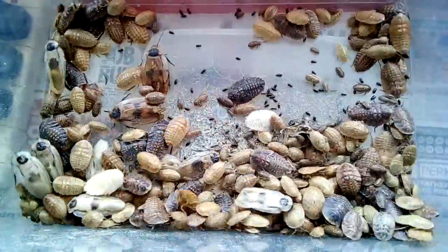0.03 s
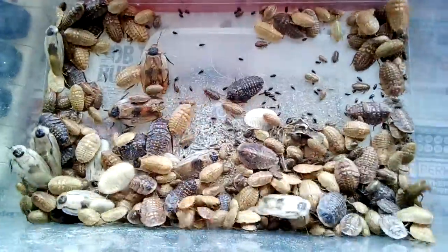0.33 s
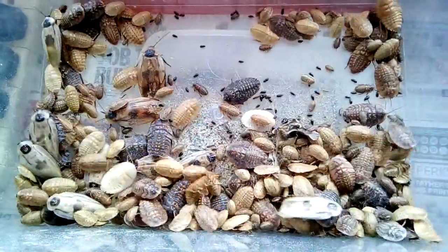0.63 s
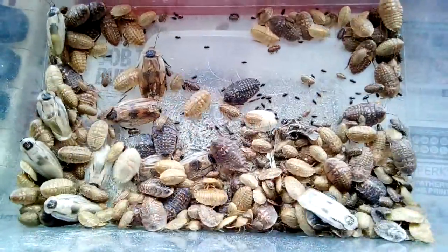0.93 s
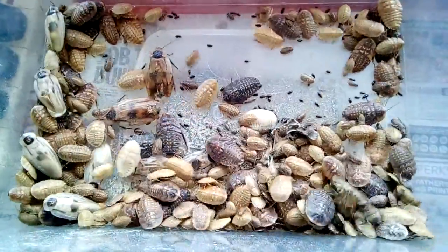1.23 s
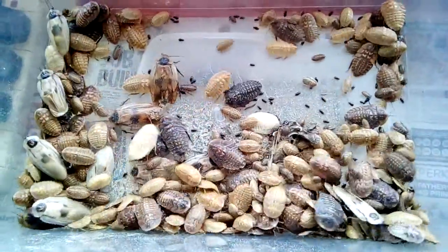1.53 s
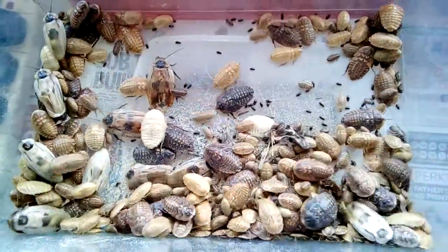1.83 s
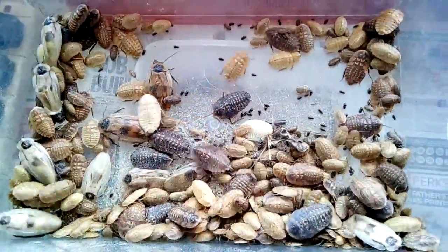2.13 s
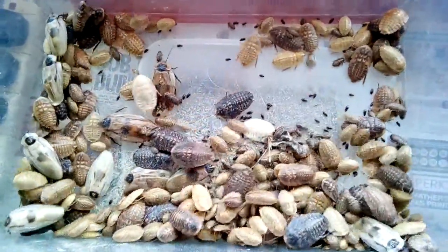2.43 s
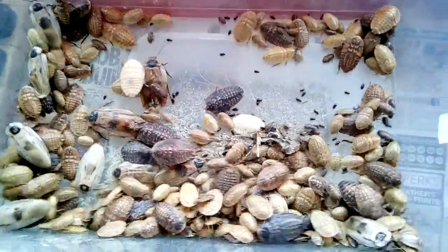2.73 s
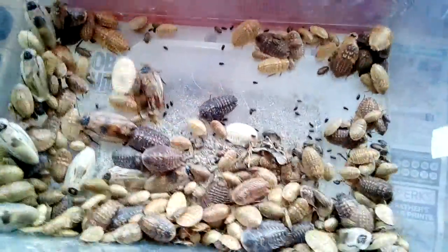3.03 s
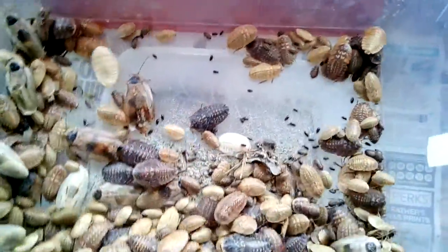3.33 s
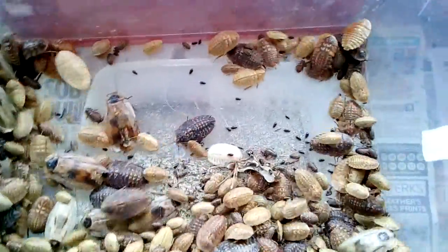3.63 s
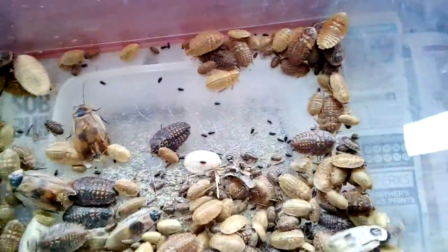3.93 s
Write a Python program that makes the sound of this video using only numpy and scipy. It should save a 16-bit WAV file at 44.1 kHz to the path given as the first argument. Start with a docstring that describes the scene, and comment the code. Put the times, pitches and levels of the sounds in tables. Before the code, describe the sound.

A close, rustling hiss of many cockroaches scuttling in a plastic container, with a few taps.

```python
"""A close, crackly hiss of cockroaches crawling over each other in a plastic tub, indoors.
Countless leg ticks and shell scrapes merge into the hiss, and the feet make the tub ring and drone.
A few sharp taps and dull bumps on the plastic stand out.
In the last second the heap scrambles harder."""
import sys
import numpy as np
from scipy import signal
from scipy.fft import rfft, irfft
from scipy.io import wavfile
from scipy.ndimage import uniform_filter1d

SR = 44100
rng = np.random.default_rng(int(sys.argv[2]) if len(sys.argv) > 2 else 0)


def dump_mix(stems):
    """Bounce the given channels to the path in sys.argv[1] as a 16-bit WAV at rate SR."""
    frames = np.atleast_2d(stems).T  # one column per channel
    limited = np.clip(frames, -1, 1)  # hard clip at full scale
    pcm = np.round(limited * 32767).astype(np.int16)
    wavfile.write(sys.argv[1], SR, pcm)


N = 176400  # 4 seconds


def gain(db):
    """Turn decibels into a number to multiply by."""
    return 10 ** (np.asarray(db) / 20)


def normalize(x):
    """Scale a sound to an average strength (rms) of 1."""
    return x / np.sqrt(np.mean(x ** 2))


def fade(rows, column=1):
    """A gain that glides from one (time, level) row to the next."""
    rows = np.array(rows)
    return gain(np.interp(np.arange(N) / SR, rows[:, 0], rows[:, column]))


def shape_tone(x, points):
    """Make some frequencies stronger than others, then scale to strength 1."""
    hz, db = np.array(points).T
    freqs = np.maximum(np.fft.rfftfreq(N, 1 / SR), 1)
    gains = gain(np.interp(np.log(freqs), np.log(hz), db))
    return normalize(irfft(rfft(x) * gains, N))


def resonate(x, hz, width, passes=1):
    """Keep the sound around one pitch; a narrower width rings longer."""
    b, a = signal.iirpeak(hz, hz / width, fs=SR)
    for _ in range(passes):
        x = signal.lfilter(b, a, x)
    return x


def cut_highs(x, edge_hz=7000):
    """Steeply remove the treble above the edge."""
    return signal.sosfilt(signal.butter(12, edge_hz, fs=SR, output="sos"), x)


def wander(per_s):
    """Drift up and down, gliding to a new random value per_s times a second."""
    hold = int(SR / per_s)
    steps = np.repeat(rng.standard_normal(N // hold + 2), hold)
    return normalize(uniform_filter1d(steps, hold)[hold // 2:hold // 2 + N])


def ticks(per_s, spread_db):
    """Tiny hits at random times: most are faint, a few are strong."""
    size = gain(spread_db * np.minimum(rng.exponential(size=N), 7))
    hits = rng.random(N) < per_s / SR
    return normalize(hits * size * rng.standard_normal(N))


def strike(at, hz, width):
    """One blow sets off a ring that dies quickly; its peak is 1."""
    blow = 1e-18 + (np.arange(N) == int(at * SR))  # the tiny offset keeps the filter fast
    ring = resonate(blow, hz, width, passes=3)
    return ring / np.max(np.abs(ring))


# tone of the rustling legs (frequency [Hz], relative level [dB])
RUSTLE_TONE = [(530, -49), (900, -24), (1070, -9), (1240, -11), (1480, -1), (1630, -6), (2000, -2),
               (2600, -11), (3170, -13.5), (4400, -11), (5300, -10), (5900, -6), (6600, -10), (7500, -16.5)]
# how busy the heap is (time [s], rustle level [dB], claw fizz level [dB])
HEAP_LEVELS = [(0, -56, -60), (.65, -54.5, -60), (1.0, -55, -60.5), (1.22, -56.5, -62), (1.58, -54, -60),
               (2.0, -55.5, -62), (2.4, -54.5, -62.5), (2.76, -54.5, -61), (3.0, -51.5, -63),
               (3.45, -60.5, -63), (4, -50, -62)]

def leg_rustle(flurry):
    """Legs tick on shells so often that the ticks blur into a hiss."""
    legs = ticks(per_s=14000, spread_db=1.45) * gain(1.2 * flurry)
    return cut_highs(shape_tone(legs, RUSTLE_TONE), edge_hz=7550) * fade(HEAP_LEVELS)


# tone of the finest claw scratching (frequency [Hz], relative level [dB])
CLAW_TONE = [(5000, -54), (7000, -1), (8200, -19), (9700, -8.5), (11000, -10), (12000, -1.5), (12800, 6.5),
             (15500, 5)]

def claw_fizz(flurry):
    """Scratching claws make a very high fizz that partly follows the flurries of the legs."""
    flicker_db = 2 * (0.68 * flurry + 0.59 * wander(per_s=60))
    scratching = ticks(per_s=25000, spread_db=1.4) * gain(flicker_db)
    single_ticks = gain(-8.5) * ticks(per_s=200, spread_db=0.8)
    return shape_tone(scratching + single_ticks, CLAW_TONE) * fade(HEAP_LEVELS, column=2)


# pitches at which the tub rings (frequency [Hz], width [Hz], relative level [dB])
TUB_PITCHES = [(247, 19.2, 5.5), (499.6, 20.7, 3.5), (752, 35, -2.5), (1065, 29, -1.5), (1418, 80, -3.5),
               (1970, 240, -11.5), (2585, 128, -5)]
# how hard the feet make the tub ring (time [s], level [dB])
RING_LEVELS = [(0, -62), (.3, -61), (.55, -57.5), (.68, -63), (.96, -57), (1.15, -63.5), (1.7, -64),
               (2.0, -61), (2.2, -59), (2.4, -61), (2.75, -64.5), (3.12, -55), (3.3, -57.5), (3.47, -60.5),
               (3.65, -59.5), (4, -57.5)]

def tub_ring():
    """Pattering feet keep the plastic ringing at its own pitches."""
    feet = ticks(per_s=2500, spread_db=1.2) * gain(1.9 * wander(per_s=20))
    ring = sum(gain(db) * resonate(feet, hz, width) for hz, width, db in TUB_PITCHES)
    return normalize(ring) * fade(RING_LEVELS)


# tone of the flexing tub (frequency [Hz], relative level [dB])
DRONE_TONE = [(25, -14), (50, -8.5), (95, -6.5), (135, -2), (165, 5), (195, -5.5), (300, -0.5), (420, -8),
              (900, -5), (1400, -28)]
# loudness of the drone (time [s], level [dB])
DRONE_LEVELS = [(0, -68), (1.0, -65), (1.3, -65), (2.0, -65), (2.1, -59), (2.35, -67.5), (2.52, -63),
                (2.75, -66.5), (3.15, -60.5), (3.7, -69.5), (3.93, -65), (4, -88)]

def tub_drone():
    """The tub flexes under the heap and gives a low drone."""
    return shape_tone(ticks(per_s=1500, spread_db=1.1), DRONE_TONE) * fade(DRONE_LEVELS)


# weight shifting on the tub's floor (time [s], peak level [dB])
WEIGHT_SHIFTS = [(0.053, -52), (.195, -56), (0.876, -56), (0.943, -52), (2.087, -47), (2.18, -52.5),
                 (2.298, -55), (3.085, -56), (3.155, -54), (3.901, -53.5)]

def floor_hums():
    """Shifting bodies make the floor of the tub hum briefly at its lowest ringing pitch."""
    return sum(gain(db) * strike(at, hz=241.6, width=49) for at, db in WEIGHT_SHIFTS)


# claw flicks and, near 2.06 s, the two contact ticks of the double bump (time [s], level [dB])
HIGH_RASPS = [(.333, -52), (.535, -55), (.89, -59), (1.42, -57), (2.053, -60), (2.066, -59), (2.12, -57),
              (2.648, -53), (2.929, -56), (2.98, -59), (3.085, -55), (3.145, -58), (3.39, -57), (3.59, -58)]

def high_rasps(fade_s=0.0092):
    """Short, very high rasps, as a claw flicks across a shell or a bump makes contact."""
    t = np.arange(N) / SR
    swells = sum(gain(db) * np.exp(-2 * ((t - at) / fade_s) ** 2) for at, db in HIGH_RASPS)
    return shape_tone(ticks(per_s=9000, spread_db=2.2), CLAW_TONE) * swells


# scrapes on shells and plastic, plus the tub's brief low ring after the thump, at 2.52 s
# (peak time [s], length [s], level [dB], frequency [Hz], width [Hz])
SCRAPES_AND_RING = [(0.34, .012, -61, 3500, 5000), (0.562, 0.024, -48, 1580, 810),
                    (0.588, 0.03, -53, 5750, 700), (0.67, 0.032, -55.5, 4470, 4000),
                    (0.986, 0.05, -57.5, 540, 450), (1.016, 0.014, -56, 2080, 800),
                    (1.098, 0.014, -57.5, 4530, 2500), (1.32, 0.032, -59, 2330, 1200),
                    (1.416, 0.023, -54.5, 3020, 5040), (1.582, 0.034, -55.5, 1800, 900),
                    (2.288, 0.013, -53.5, 4600, 2400), (2.487, 0.018, -53, 4300, 2200),
                    (2.52, 0.043, -56, 152, 90), (2.845, 0.022, -55, 5700, 2500),
                    (2.93, 0.0076, -50.5, 4000, 5000), (3.041, 0.0054, -47, 5550, 2500),
                    (3.078, 0.028, -47, 1980, 3000), (3.146, 0.011, -43, 4530, 2400),
                    (3.154, 0.045, -58.5, 533, 400), (3.266, 0.0078, -45, 6000, 1800),
                    (3.275, 0.074, -58.5, 140, 60), (3.384, 0.021, -47.5, 6300, 2500),
                    (3.424, 0.0097, -47.5, 4700, 2500), (3.457, 0.071, -54.5, 1480, 350),
                    (3.51, 0.053, -58, 149, 50), (3.589, 0.0075, -46.5, 4800, 3500),
                    (3.661, 0.02, -51, 4960, 2600), (3.881, 0.03, -49.5, 2190, 600),
                    (3.911, 0.06, -49, 152, 55.9), (3.939, 0.033, -42, 2726, 2800),
                    (3.983, 0.0077, -45, 3900, 2500)]

def scrapes_and_ring():
    """Scrapes and one low ring of the tub: ticks around one pitch swell quickly and die away."""
    t, out = np.arange(N) / SR, 0
    for at, length, db, hz, width in SCRAPES_AND_RING:
        fade_s = length * np.where(t < at, 0.6, 1.31)  # quick rise, slower fall
        swell = np.exp(-2 * ((t - at) / fade_s) ** 2)
        band = resonate(ticks(per_s=5000, spread_db=0.5), hz, width, passes=2)
        out = out + gain(db) * swell * normalize(band)
    return cut_highs(out, edge_hz=7160)


# tone of a tap's crack (frequency [Hz], relative level [dB])
CRACK_TONE = [(300, -3), (1200, 0.5), (2500, -2.5), (5400, -9), (6500, -1), (8200, -20), (9600, -11.5),
              (11000, -15), (13500, -8), (15000, -1), (17000, 0.5)]
# sharp taps on the wall; row two is the first tap's quick echo, 3 ms later
# (time [s], wall pitch [Hz], wall width [Hz], wall level [dB],
# shell pitch [Hz], shell width [Hz], shell level [dB], crack level [dB])
WALL_TAPS = [(1.0804, 3900, 3600, -32, 6000, 1700, -31, -51),
             (1.0832, 3840, 2000, -42, 6140, 1000, -37, -60), (2.4520, 3390, 900, -32, 4070, 790, -26, -29),
             (3.0543, 700, 1700, -28, 1980, 1460, -28, -43), (3.242, 1700, 700, -28, 5740, 1800, -24, -25),
             (3.6377, 3050, 3500, -30.5, 4840, 2500, -30.5, -49)]

def wall_taps(crack_s=0.00055):
    """Each tap, and the first one's echo, is a crack with a very short ring of wall and shell."""
    t, out = np.arange(N) / SR, 0
    for at, wall_hz, wall_width, wall_db, shell_hz, shell_width, shell_db, crack_db in WALL_TAPS:
        wall = gain(wall_db) * strike(at, wall_hz, wall_width)
        shell = gain(shell_db) * strike(at, shell_hz, shell_width)
        burst = np.exp(-((t - at) / crack_s - 1) ** 2)
        crack = gain(crack_db) * burst * shape_tone(rng.standard_normal(N), CRACK_TONE)
        out = out + cut_highs(wall + shell, edge_hz=8000) + crack
    return out


# a double bump, then a thump (time [s], pitch [Hz], width [Hz], peak level [dB], overtone level [dB])
DULL_BUMPS = [(2.0500, 359, 186, -34.5, -38.5), (2.0615, 365, 222, -34.5, -37.5),
              (2.4513, 86, 148, -35.5, -66)]

def dull_bumps(overtone_ratio=1.7):
    """A soft knock flexes the tub: a low note plus a higher one, its overtone."""
    out = 0
    for at, hz, width, db, overtone_db in DULL_BUMPS:
        low_note = gain(db) * strike(at, hz, width)
        overtone = gain(overtone_db) * strike(at, hz * overtone_ratio, width)
        out = out + low_note + overtone
    return out


# tone of the scrambling shells (frequency [Hz], relative level [dB])
SCRAMBLE_TONE = [(150, -15), (300, -16), (550, -6), (800, -9), (1150, -10), (1450, 0.5), (2050, 1),
                 (2900, -6), (3900, -1.5), (4700, 0), (5500, -2.5), (6600, 0), (7500, -10.5)]
# tone of the bright sizzle on top (frequency [Hz], relative level [dB])
SIZZLE_TONE = [(9000, -45), (12000, -27), (13300, -8), (14500, 1), (15500, 4)]
# how hard the heap scrambles (time [s], level [dB])
SCRAMBLE_LEVELS = [(0, -67), (2.85, -64), (3.02, -55.5), (3.08, -48.5), (3.26, -47.5), (3.33, -50),
                   (3.43, -48.5), (3.68, -51), (3.83, -50), (3.93, -52.5), (4, -50.5)]

def scramble():
    """Shells rub together in a gritty rush that stays faint until the last second."""
    shells = ticks(per_s=11000, spread_db=1.4) * gain(wander(per_s=71.1))
    rush = cut_highs(shape_tone(shells, SCRAMBLE_TONE), edge_hz=6970)
    sizzle = gain(-7) * shape_tone(shells, SIZZLE_TONE)
    return (rush + sizzle) * fade(SCRAMBLE_LEVELS)


def room(x, echo_db, decay_s=0.11):
    """Add short echoes from the tub and the room; they fall by 60 dB in decay_s."""
    t = np.arange(SR // 2) / SR
    decay = np.exp(-np.log(1000) * t / decay_s) * (t > 0.002)  # the first echo takes 2 ms
    echoes = cut_highs(rng.standard_normal(len(t))) * decay
    echoes /= np.sqrt(np.sum(echoes ** 2))
    return x + gain(echo_db) * signal.fftconvolve(x, echoes)[:N]


def scene():
    """The crawling heap, taps and bumps in a small room, over faint microphone hiss."""
    hiss = gain(-82) * rng.standard_normal(N)
    flurry = wander(per_s=67.2)  # quick bursts of movement shared by legs and claws
    heap = leg_rustle(flurry) + claw_fizz(flurry) + scramble() + tub_ring() + tub_drone()
    crawling = room(heap + scrapes_and_ring() + high_rasps() + floor_hums(), echo_db=-14)
    knocks = room(wall_taps() + dull_bumps(), echo_db=-16)
    return (crawling + knocks + hiss)[None]


def record(dry, low_hz=36, top_hz=15500):
    """Thin out the deep bass and cut off the highest treble."""
    bass_cut = signal.butter(2, low_hz, "high", fs=SR, output="sos")
    treble_cut = signal.ellip(12, 0.2, 60, top_hz, fs=SR, output="sos")
    return signal.sosfilt(treble_cut, signal.sosfilt(bass_cut, dry))


dry = scene()
out = record(dry)
dump_mix(out)
```